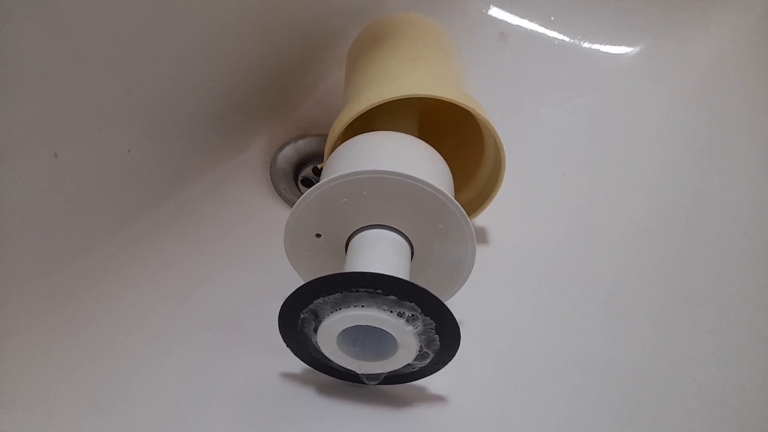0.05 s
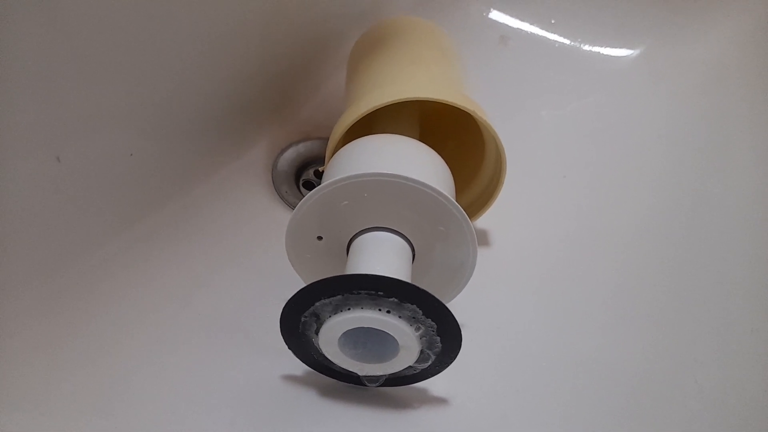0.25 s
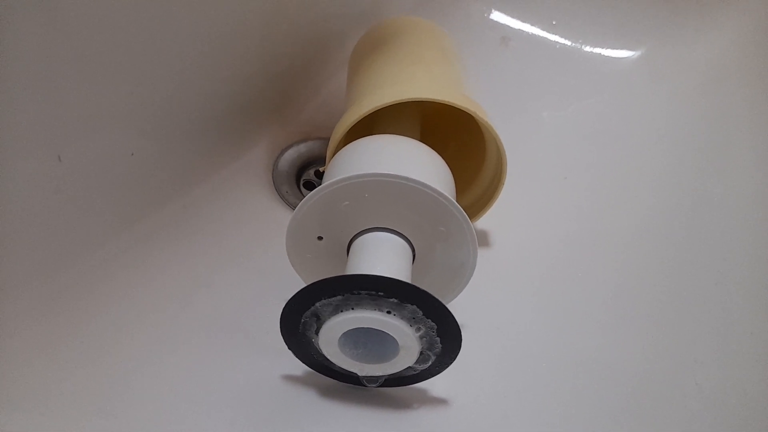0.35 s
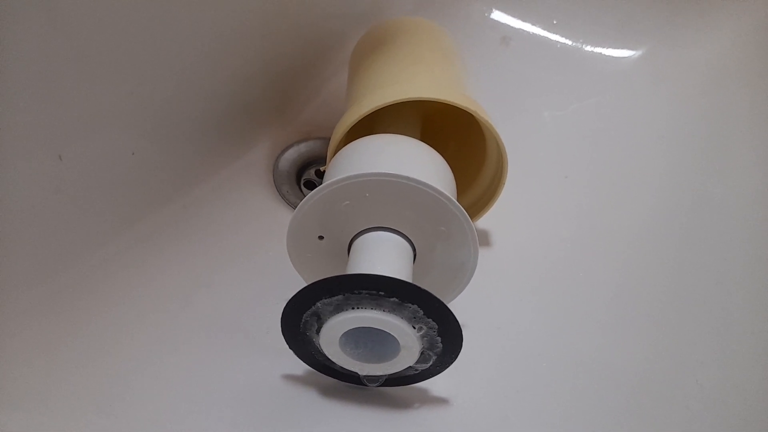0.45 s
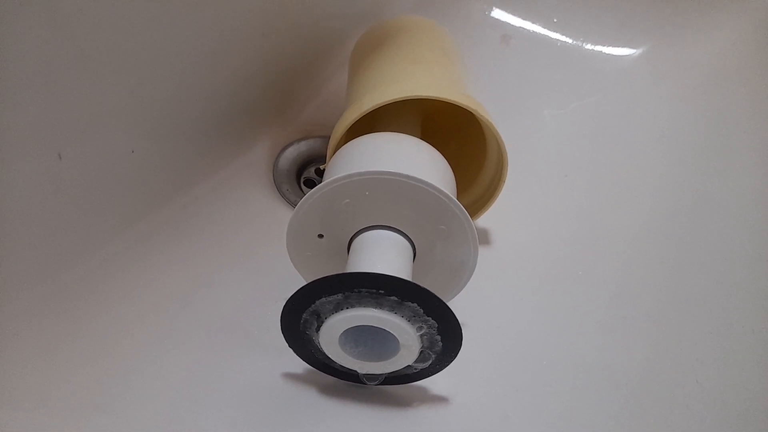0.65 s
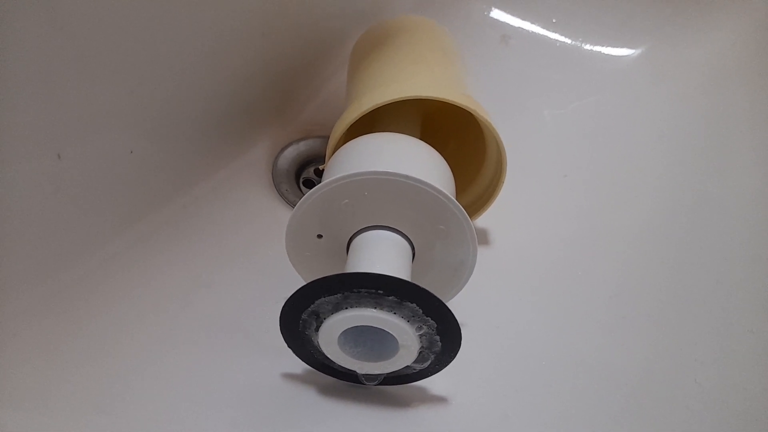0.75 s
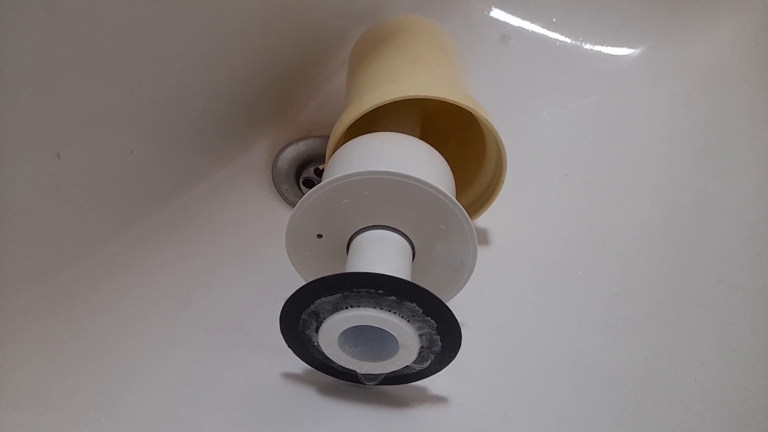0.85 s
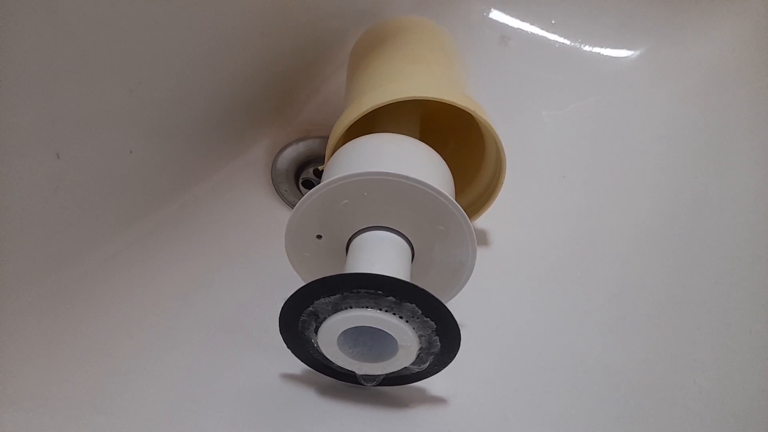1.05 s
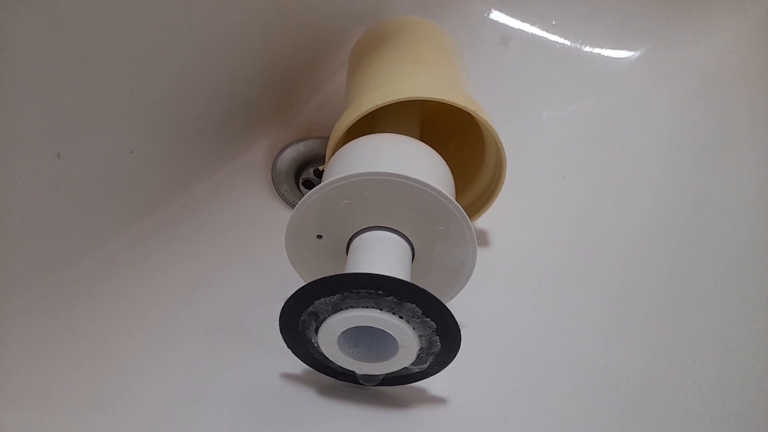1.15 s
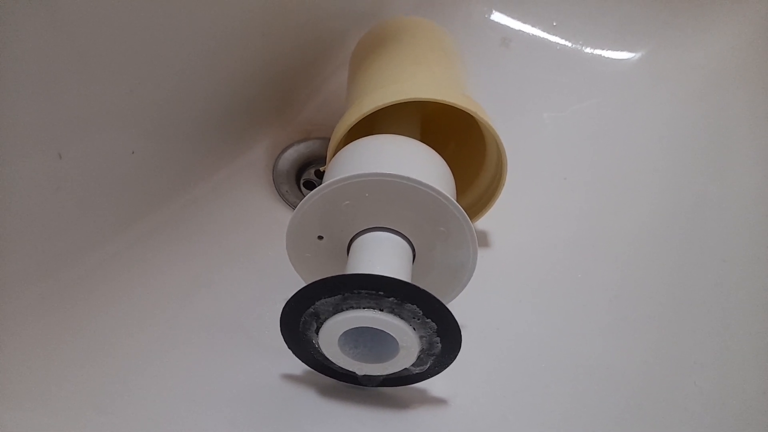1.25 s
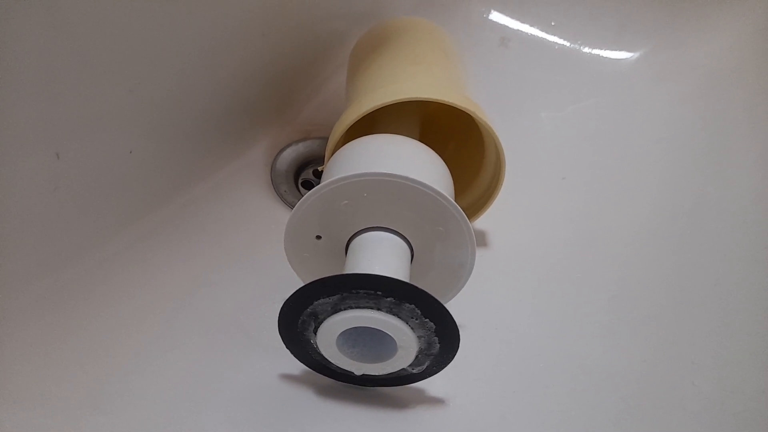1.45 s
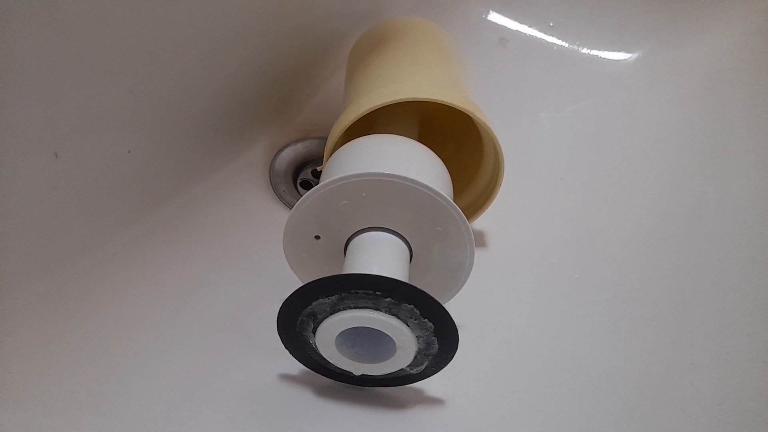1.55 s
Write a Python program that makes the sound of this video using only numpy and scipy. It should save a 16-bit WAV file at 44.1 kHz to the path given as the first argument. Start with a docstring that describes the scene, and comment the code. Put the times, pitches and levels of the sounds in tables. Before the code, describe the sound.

One dull knock with a quick rattle booms and dies away in a small, quietly rumbling bathroom. Tiny bubbles hiss in a nearby basin throughout, gradually weakening, while faint thuds come from further off.

```python
"""A small bathroom rumbles quietly while, close by, water fizzes in a basin, tiny bubbles bursting in it.
Just after a faint far bump comes a dull knock, like a door bumping shut beyond the wall: four quick
contacts set low modes booming and send a clatter of reflections through the room.
The knock rings out, the fizz slowly dies down, and a few more faint bumps come from further off."""
import sys
import numpy as np
from scipy import signal
from scipy.fft import rfft, irfft
from scipy.io import wavfile

SR = 44100
rng = np.random.default_rng(int(sys.argv[2]) if len(sys.argv) > 2 else 0)


def unload_wav(signal):
    """Save mono or channel-first audio to the path in sys.argv[1] as 16-bit WAV at rate SR, clipped to [-1, 1]."""
    wavfile.write(
        sys.argv[1],
        SR,
        np.round(np.clip(np.atleast_2d(signal).T, -1, 1) * 32767).astype(np.int16),
    )


N = 70560
FREQS = np.fft.rfftfreq(N, 1 / SR)
SPREAD = np.array([[.5], [-.5]])  # half to the left ear, the opposite half to the right


def amp(db):
    """Decibels to gain."""
    return 10 ** (np.asarray(db) / 20)


def unit_rms(x):
    """Scales to an rms of one."""
    return x / np.sqrt(np.mean(x ** 2) + 1e-20)


def curve(points, hz=FREQS):
    """Reads a table on a log-frequency axis."""
    f, value = np.transpose(points)
    return np.interp(np.log(hz + 1), np.log(f + 1), value)


def since(start):
    """Seconds since start, zero before it."""
    return np.maximum(np.arange(N) / SR - start, 0)


def stereo_noise(correlation):
    """White noise for two ears, alike by the given amount at each frequency."""
    left, other = rfft(rng.standard_normal((2, N)))
    alike = np.clip(curve(correlation), -1, 1)
    return irfft(np.array([left, alike * left + np.sqrt(1 - alike ** 2) * other]), N)


def equalise(x, eq, pan):
    """Gives a stereo pair a tone and a left-right balance, at unit rms."""
    db = curve(eq) + SPREAD * curve(pan)
    return unit_rms(irfft(rfft(x) * amp(db), N))


# Room tone EQ, heavy in the lows: f/Hz, relative level/dB
ROOM_EQ = [(20, -35.5), (45, -8), (80, 3), (130, 0.5), (200, -8), (400, -10.5), (700, -17.5), (1400, -21.5),
           (2000, -24), (3400, -26), (6000, -27)]
# Its stereo image, wide above the bass: f/Hz, left-right correlation
ROOM_CORRELATION = [(60, 0.81), (150, 0.22), (400, 0.11), (1000, 0.0039), (3000, 0.03)]
# Its balance: f/Hz, left over right/dB
ROOM_PAN = [(60, -3), (170, 2.5), (400, -0.5), (2500, 3.5)]


def room_tone(level_db=-70):
    """A bed of steady low rumble."""
    return amp(level_db) * equalise(stereo_noise(ROOM_CORRELATION), ROOM_EQ, ROOM_PAN)


# Faint thuds from further off: t/s, level/dB, centre f/Hz, t60/s
FAR_BUMPS = [(0.049, -58, 418, 0.14), (0.871, -75, 280, 0.52), (.95, -64, 117.5, 0.52),
             (1.372, -67.5, 272, 0.39), (1.395, -61, 85, 0.32)]


def far_bump(start, db, hz, t60, attack_s=0.0089, width_octaves=0.21):
    """A soft, muffled bump: a narrow band of noise that dies away in the room."""
    t = since(start)
    band = np.exp(-.5 * (np.log2((FREQS + 1) / hz) / width_octaves) ** 2)
    body = unit_rms(irfft(rfft(stereo_noise(ROOM_CORRELATION)) * band, N))
    return body * (1 - np.exp(-t / attack_s)) * amp(db - 60 * t / t60)


def bubble_pops(pops_per_s=1500, pitches=18, decay_s=0.00032, spread_db=3.2):
    """Each bursting bubble is a tiny ping at its own pitch."""
    t = np.arange(300) / SR
    out = np.zeros((2, N))
    for hz in np.linspace(4430, 15600, pitches):
        size = amp(spread_db * np.minimum(rng.exponential(1, (2, N)), 4.6))
        bursts = size * (rng.random((2, N)) < pops_per_s / pitches / SR)
        ping = np.exp(-t / decay_s) * np.sin(2 * np.pi * hz * t)
        out += signal.oaconvolve(bursts, [ping], axes=1)[:, :N]
    return unit_rms(out)


# Bright, airy EQ of the fizz in each ear: f/Hz, relative level/dB
FIZZ_EQ_LEFT = [(1000, -30), (2600, -23), (3550, -28), (4200, -18), (5300, -10), (6600, -8), (7700, -10.5),
                (9700, -.5), (12300, 0), (14000, -2.8), (15800, -3.8)]
FIZZ_EQ_RIGHT = [(1000, -32), (2800, -26), (3400, -29), (4200, -21), (5300, -11), (6700, -8.5),
                 (7400, -12.5), (8200, -20), (9500, -13.5), (11000, -7.3), (12500, -7.7), (14400, -5.7),
                 (15800, -6.7)]
# Its slow fade: t/s, level/dB
FIZZ_FADE = [(0, -50.5), (.22, -52.5), (.31, -50), (.45, -53), (.62, -55), (1.0, -57), (1.3, -58.5),
             (1.6, -60)]


def water_fizz():
    """Countless tiny bubbles merge into a hiss; larger ones stand out as ticks."""
    hiss = rng.standard_normal((2, N))
    ticks = amp([[-6], [-9]]) * bubble_pops()  # stronger on the left
    eq = amp([curve(FIZZ_EQ_LEFT), curve(FIZZ_EQ_RIGHT)])
    fade = amp(np.interp(since(0), *np.transpose(FIZZ_FADE)))
    return unit_rms(irfft(rfft(hiss + ticks) * eq, N)) * fade


def contact_envelope(contact, hz, t60, crossover_hz=276, build_cycles=0.51, lag_s_per_khz=0.02):
    """One hit swells and decays: deep notes need time to build, treble arrives by many reflections."""
    start, bass_db, treble_db = contact
    t = since(start)
    attack_s = build_cycles / hz + lag_s_per_khz * hz / 1000
    hit_db = treble_db + (bass_db - treble_db) / (1 + (hz / crossover_hz) ** 4)
    return (1 - np.exp(-t / attack_s)) * amp(hit_db - 60 * t / t60)


# EQ of the knock's diffuse tail: f/Hz, relative level/dB
CLATTER_EQ = [(30, -31), (60, -8.5), (130, 3.5), (300, -4.5), (620, -6.5), (800, -11), (1200, -10.5),
              (2000, -12), (3000, -17.5), (4500, -23), (8000, -48)]
# Its decay, shorter in the highs: f/Hz, t60/s
CLATTER_DECAY = [(60, 0.8), (250, 0.61), (600, .54), (1400, 0.46), (3500, 0.35)]
# Its stereo image: f/Hz, left-right correlation
CLATTER_CORRELATION = [(60, 0.51), (120, 0.81), (190, 0.88), (380, 0.22), (700, 0.46), (1300, 0)]
# Its balance: f/Hz, left over right/dB
CLATTER_PAN = [(60, -15), (130, 7.5), (600, -1.3), (1200, -1), (4000, -2.3)]


def clatter(contacts):
    """Dense reflections of each contact build up and die away, band by band."""
    centres_hz = np.geomspace(40, 8000, 9)
    bands = [np.interp(np.log(FREQS + 1), np.log(centres_hz), row) for row in np.eye(len(centres_hz))]
    out = np.zeros((2, N))
    for contact in contacts:
        spectrum = rfft(equalise(stereo_noise(CLATTER_CORRELATION), CLATTER_EQ, CLATTER_PAN))
        for hz, band in zip(centres_hz, bands):
            out += irfft(spectrum * band, N) * contact_envelope(contact, hz, curve(CLATTER_DECAY, hz))
    return out


# Resonances that give the knock its body: f/Hz, relative level/dB, t60/s
KNOCK_MODES = [(54.5, -26, 0.79), (78.26, -8.5, 0.52), (124, -3.5, .64), (144.8, -1, 0.52),
               (169.8, -7, 0.44), (183.2, -6, 0.45), (234.5, -3.5, .34), (267, -12.5, .42),
               (323.1, -10.5, 0.55), (344.7, -17, 0.49), (364.5, 6.5, 0.032), (412, -17, 0.52),
               (500, -18.5, 0.56), (556, -19, 0.63), (614.2, -13.5, 0.5), (986.4, -20.5, 0.5),
               (1492, -23.5, 0.49), (2155, -23.5, 0.33)]


def boom(contacts, widen_hz=545):
    """Each contact feeds the modes afresh; the higher ones reach the two ears out of step."""
    t = since(contacts[0][0])
    out = np.zeros((2, N))
    for k, (hz, db, t60) in enumerate(KNOCK_MODES):
        ring = sum(contact_envelope(contact, hz, t60) for contact in contacts)
        ear_phase = (-1) ** k * SPREAD * min((hz / widen_hz) ** 2, np.pi / 2)
        out += amp(db) * ring * np.sin(2 * np.pi * hz * t + ear_phase)
    return out


# The hits that make up the knock: t/s, relative bass level/dB, relative treble level/dB
KNOCK_CONTACTS = [(.228, -6.5, 2), (0.261, -10.5, 0), (0.282, -2.5, 1), (0.332, -3, 2.5)]


def knock(gain_db=-38.5):
    """A quick run of contacts: light ones rattle, heavy ones also boom."""
    return amp(gain_db) * (boom(KNOCK_CONTACTS) + clatter(KNOCK_CONTACTS))


def scene():
    """The knock over the fizzing water, the quiet room and the far bumps."""
    return knock() + water_fizz() + room_tone() + sum(far_bump(*row) for row in FAR_BUMPS)


def record(dry, cutoff_hz=15750):
    """A steep low-pass trims the very top."""
    taps = signal.firwin(1401, cutoff_hz, window=("kaiser", 8), fs=SR)
    return signal.oaconvolve(dry, taps[None], "same")


dry = scene()
out = record(dry)
unload_wav(out)
```